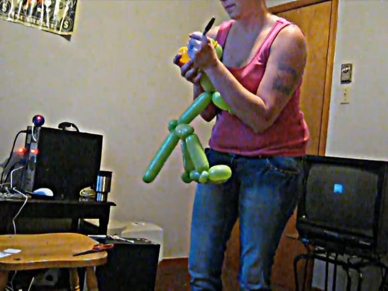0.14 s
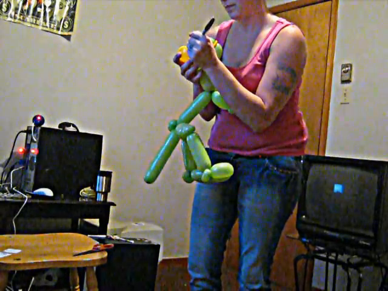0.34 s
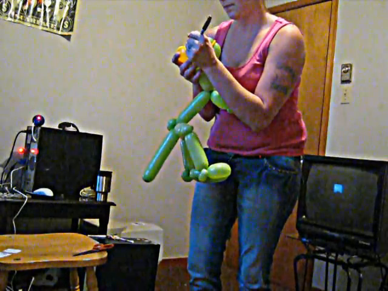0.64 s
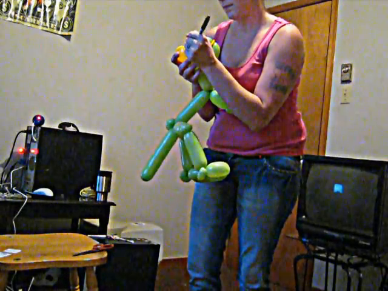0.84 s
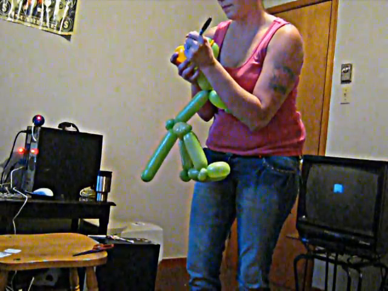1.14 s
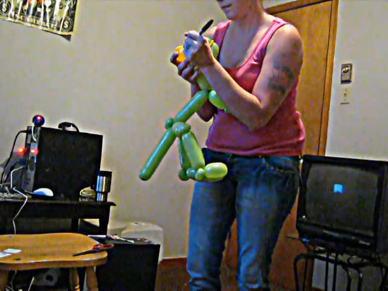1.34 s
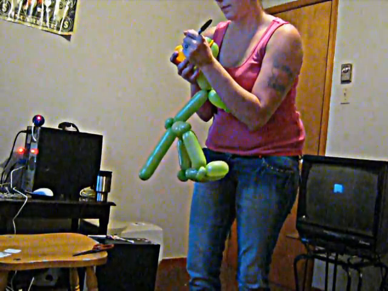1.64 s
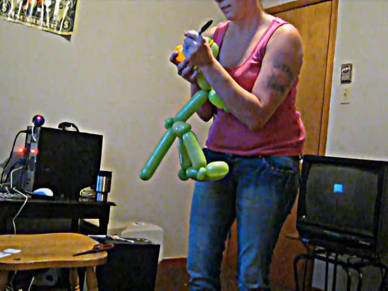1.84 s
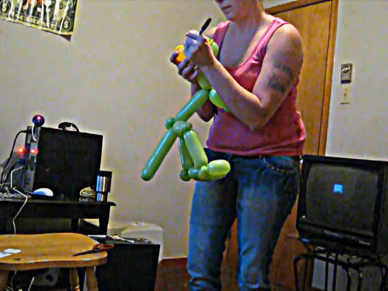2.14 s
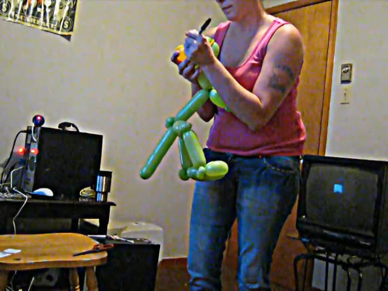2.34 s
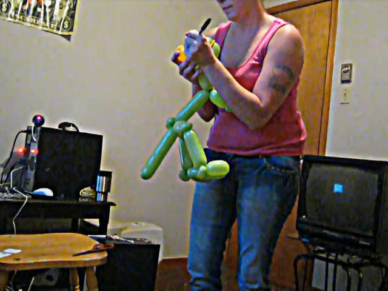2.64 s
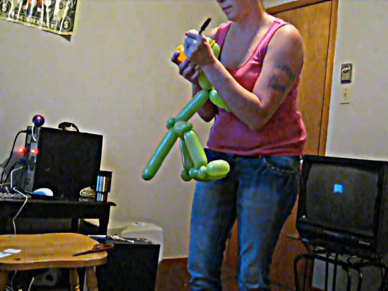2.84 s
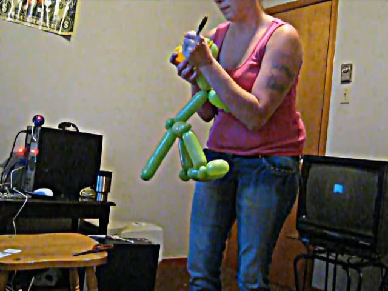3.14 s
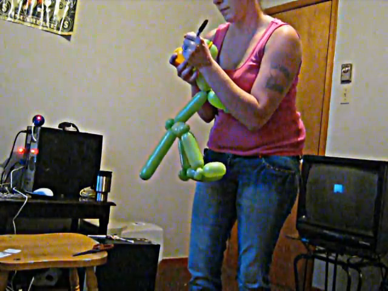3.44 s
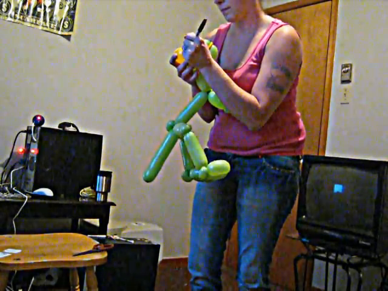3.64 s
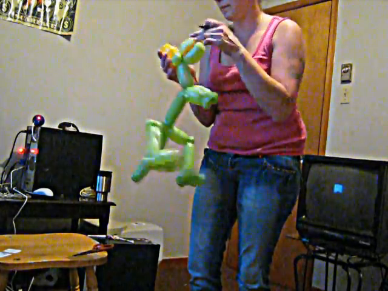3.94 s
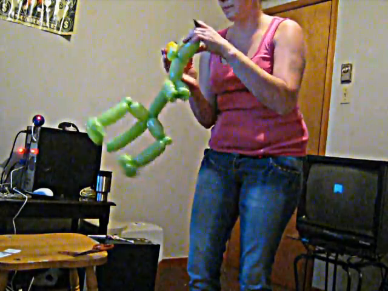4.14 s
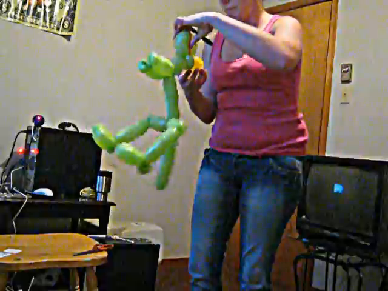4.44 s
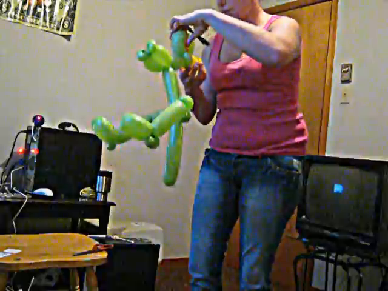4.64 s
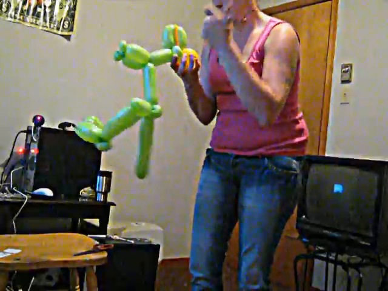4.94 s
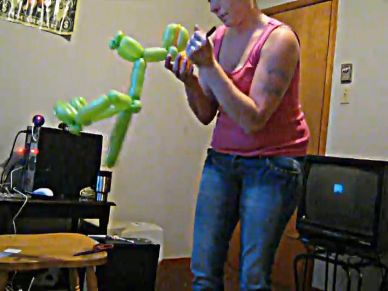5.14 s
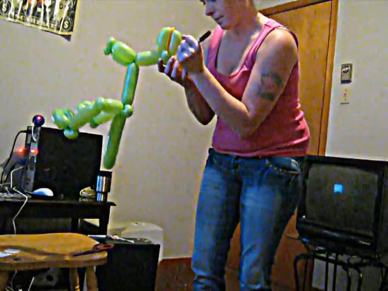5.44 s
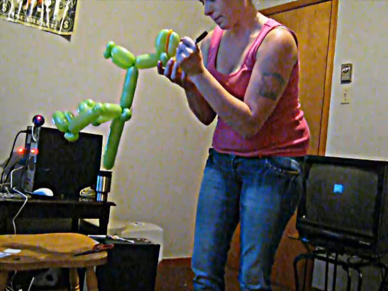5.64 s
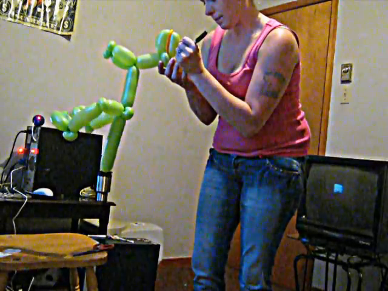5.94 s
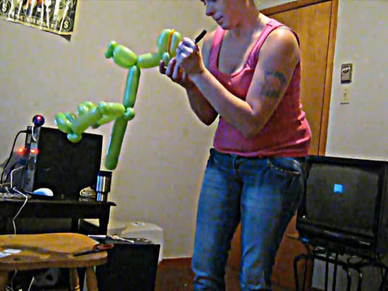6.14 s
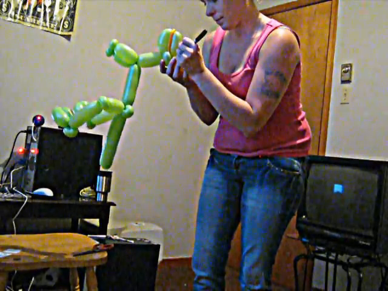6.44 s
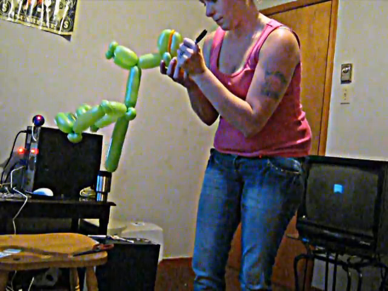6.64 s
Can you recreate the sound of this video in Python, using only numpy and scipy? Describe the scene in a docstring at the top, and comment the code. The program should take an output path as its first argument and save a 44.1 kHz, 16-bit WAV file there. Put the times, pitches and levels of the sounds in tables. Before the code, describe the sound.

A small, lively room with steady hiss and a low hum, heard a few steps away. From 0 to 1 s a marker squeaks on a tight balloon in quick short strokes, about ten a second, alternating bright squeals with lower, rougher scrapes. From 1 to 1.5 s the strokes lengthen and jump in pitch, then leave a gap to about 1.8 s, with one barely audible touch. A long stroke dips and climbs until 2.15 s, and dense squeaks continue to 3.8 s, with faint soft thumps beneath. At 3.8 s the skin snaps and the balloon is turned: irregular hollow creaks, dry rasps, clicks and brief thin whistles, busiest from 4.2 to 5 s, thinning out by 5.5 s with two sharp snaps. Quiet room tone follows. At 6.17 s comes one loud, crisp tap with a short ring off the walls; from about 6.65 s a last low squeak wavers to 6.8 s.

```python
"""A marker draws circles on a balloon figure in a small room, a few steps from the microphone.
The tip sticks and slips on the latex: trains of clicks, coloured by the skin, squeak, squeal and scrape.
Then hands turn the figure: uneven slips creak and rasp, the skin snaps as decaying noise clicks,
the tip taps down once and the drawing goes on. Brief skids whistle, soft low thumps sound underneath.
Near walls reflect the balloon over steady hiss and hum; a fast limiter rides the peaks."""
import sys
import numpy as np
from scipy import signal
from scipy.fft import rfft, irfft
from scipy.io import wavfile
from scipy.ndimage import uniform_filter1d, minimum_filter1d

SR = 44100
rng = np.random.default_rng(int(sys.argv[2]) if len(sys.argv) > 2 else 0)


def digitize_waveform(pressure):
    """Quantize a signal to 16-bit integers and store it at the path in sys.argv[1].

    Rows of a 2-D input are taken as channels; values are limited to [-1, 1].
    """
    field = np.atleast_2d(pressure).T
    bounded = np.clip(field, -1, 1)
    quanta = np.round(bounded * 32767).astype(np.int16)
    wavfile.write(sys.argv[1], SR, quanta)


N = 299638
TIME = np.arange(N) / SR
CLOCK = TIME[::40]  # coarser time grid for slow controls [s]
EDGE_HZ = 7450  # upper edge of the sound


def from_db(db):
    """Decibels to gain."""
    return 10 ** (np.asarray(db) / 20)


def unit(x):
    """Scales to rms 1."""
    return x / np.sqrt(np.mean(x ** 2) + 1e-20)


def read(points, hz):
    """Reads a curve on a log-frequency axis."""
    f, value = np.transpose(points)
    return np.interp(np.log(hz + 1), np.log(f), value)


def colour(x, points, size=2048):
    """Causal minimum-phase filter with the given spectrum."""
    hz = abs(np.fft.fftfreq(size, 1 / SR))
    log_gain = np.log(from_db(read(points, hz)))
    taps = np.fft.ifft(np.exp(np.conj(signal.hilbert(log_gain)))).real
    return signal.oaconvolve(x, taps[:size // 2])[:N]


def ring(x, hz, width_hz):
    """One resonance."""
    return signal.lfilter(*signal.iirpeak(hz, hz / width_hz, fs=SR), x)


def wander(hz):
    """Random drift of rms 1, mostly slower than hz."""
    return unit(signal.sosfilt(signal.butter(2, hz, fs=SR, output="sos"), rng.standard_normal(N)))


def steady(x, size=500):
    """Holds the short-term rms near 1, over windows of size samples."""
    power = uniform_filter1d(uniform_filter1d(x ** 2, size), size)
    return x / np.sqrt(abs(power) + 1e-20)


def slips(turns):
    """One click at each whole turn, shared between two samples to keep its exact moment."""
    at = np.flatnonzero(np.diff(np.floor(turns)) > 0)
    late = (np.floor(turns[at + 1]) - turns[at]) / (turns[at + 1] - turns[at])
    clicks = np.zeros(N)
    clicks[at] += 1 - late
    clicks[at + 1] += late
    return clicks


def envelope(start, length, shape):
    """Smooth rise, a hold that fades a little, then release."""
    rise_s, fade_db, release_s = shape
    age = CLOCK - start
    rise = .5 + .5 * np.tanh(age / rise_s / 2)
    hold = from_db(fade_db * np.clip(age / length, 0, 1))
    release = np.exp(-np.maximum(age - length, 0) / release_s)
    return rise * hold * release


def bend(start, length, pitches):
    """The tip speeds up and slows down: one arc through the first, middle and last pitch."""
    arc = np.polyfit([0, .5, 1], pitches, 2)
    return np.polyval(arc, np.clip((CLOCK - start) / length, 0, 1))


def drawing():
    """One tip plays all the strokes: the strongest at each moment sets its pitch and character."""
    # squeals: (start [s], length [s], relative level [dB],
    #           first, middle and last slip rate [Hz], treble lift [dB])
    squeals = [(0, 0.042, -23, 814.6, 839.9, 825, -4.5), (.272, 0.043, -18.5, 800.5, 834.5, 854.2, -5.5),
               (0.49, .06, -18.5, 789.6, 755, 803.7, -1.5), (0.596, .028, -27.5, 775.3, 801, 780.4, -12),
               (0.709, .05, -18.5, 710.5, 704.1, 659.6, 4), (2.2, .04, -23, 766.7, 842, 833.7, -3),
               (2.257, .036, -21.5, 833.7, 804.7, 760.8, -7.5),
               (2.374, 0.032, -24.5, 786.2, 801.6, 794.5, -3), (2.401, .0126, -12, 800.4, 792, 759.7, -5.5),
               (2.501, .03, -22.5, 758.8, 819, 819.3, -8), (2.722, .04, -23, 769.6, 816, 829, -8.5)]
    # short, light strokes: (start [s], length [s], relative level [dB], first, middle and last pitch [Hz])
    squeaks = [(0.116, 0.032, -35, 620.2, 750, 700.4), (0.356, 0.02, -28, 628.1, 745, 808.7),
               (.565, 0.023, -29.5, 579.2, 722.7, 780.5), (0.901, 0.057, -21, 704, 772, 739),
               (2.6, 0.054, -23, 729.4, 690.4, 570), (2.808, 0.024, -28, 571.8, 719, 768),
               (2.834, 0.029, -20, 690.6, 624.7, 561.3), (2.914, 0.049, -26.5, 698.3, 770.5, 716.8),
               (3.305, .022, -22, 682.5, 665, 621.2), (3.352, 0.069, -22.5, 567.8, 783, 651),
               (3.486, .075, -25, 688.7, 716.3, 583), (3.608, 0.045, -28.5, 662.3, 735, 693),
               (3.693, .03, -27, 597, 689, 716)]
    # the tip presses harder: (start [s], length [s], relative level [dB], lowest pitch [Hz])
    scrapes = [(0.211, .056, -22, 479.6), (0.437, 0.052, -28.5, 479.5), (0.642, 0.064, -26.5, 500),
               (0.769, 0.049, -27.5, 560), (0.843, 0.055, -23, 470.2), (0.958, .045, -27.5, 538),
               (1.32, 0.057, -27, 469.3), (2.294, 0.034, -27, 530), (2.418, 0.071, -24.5, 480.3),
               (2.656, .06, -25.5, 541.7), (2.868, 0.043, -26, 529), (3.249, .05, -24.5, 487.8),
               (3.415, .06, -27, 484), (3.725, 0.059, -24.5, 458.5)]
    # long strokes that glide in pitch, one curve each: (time [s], slip rate [Hz], relative level [dB])
    glides = [
        [(1.012, 732, -29.5), (1.052, 711, -24), (1.07, 555, -23.5), (1.092, 567, -20), (1.115, 678, -26.5),
         (1.15, 660, -35.5), (1.195, 709, -34.5)],
        [(1.208, 493.5, -22.5), (1.26, 503.7, -22), (1.278, 650, -22), (1.298, 629, -22.5), (1.32, 487, -27),
         (1.395, 472, -24.5), (1.44, 482.7, -32.5), (1.475, 493.6, -29.5), (1.53, 482, -37.5)],
        [(1.787, 500.6, -29), (1.82, 468, -29), (1.845, 477.7, -29), (1.877, 496, -29), (1.895, 544, -18.5),
         (1.928, 593, -22), (1.972, 507.4, -25), (2.04, 637, -23), (2.095, 802.5, -25), (2.145, 794.3, -28)],
        [(3.005, 478, -31.5), (3.046, 492, -23.5), (3.056, 610.5, -24), (3.075, 630, -21.5),
         (3.125, 721.3, -22), (3.175, 762, -26), (3.2, 684.5, -27), (3.228, 660, -24), (3.25, 520.2, -28.5)],
        [(6.63, 472, -41), (6.674, 451.6, -26.5), (6.7, 481.2, -23), (6.728, 480, -24), (6.756, 404.3, -28.5),
         (6.79, 440.3, -24.5)],
    ]
    strokes = [glide(curve) for curve in glides]
    strokes += [squeak(*row) for row in squeaks]
    strokes += [scrape(*row) for row in scrapes]
    strokes += [squeal(*row) for row in squeals]
    strokes = np.array([np.broadcast_arrays(*stroke) for stroke in strokes])
    weight = strokes[:, :1] ** 4 + 1e-30
    controls = (weight * strokes[:, 1:]).sum(0) / weight.sum(0)
    gain = strokes[:, 0].max(0)
    return [np.interp(TIME, CLOCK, control) for control in (gain, *controls)]


def squeal(start, length, db, first_hz, middle_hz, last_hz, lift_db):
    """A squeak whose slips lock to the skin, so that it jumps an octave; the weaker, the rougher."""
    shape = (.0025, -3.5, .007)  # rise [s], fade [dB], release [s]
    second_slip, grit_db = .842, -37.5  # share of the slip halfway; grit under the stroke
    hz = bend(start, length, [first_hz, middle_hz, last_hz])
    return from_db(db) * envelope(start, length, shape), hz, from_db(grit_db - db), second_slip, lift_db


def disperse(x, spread_s=0.003002):
    """High notes run through the skin faster than low ones, so each slip is drawn out."""
    hz = np.fft.rfftfreq(2 * N, 1 / SR)
    delay = spread_s * np.maximum(1 - hz / EDGE_HZ, 0)
    phase = -2 * np.pi * np.cumsum(delay) * hz[1]
    return irfft(rfft(x, 2 * N) * np.exp(1j * phase))[:N]


def marker(gain, hz, rough, locked, lift_db):
    """Stick-slip pulses of the tip, radiated by the balloon's skin."""
    # colour of the balloon under the tip: (frequency [Hz], level [dB])
    skin = [(330, -34), (420, -6.5), (520, -7), (730, 0.5), (860, -1), (1000, 1.5), (1250, 1.5),
            (1580, 3.5), (2200, 0.5), (2950, 2), (3350, -1), (4200, -2.5), (5200, -11), (7000, -31)]
    rough = np.clip(rough, 0, 1)
    # a rough stroke lurches in pitch, a squeal wavers
    lurch = rough * (.062 * wander(430) + .085 * wander(45))
    waver = .01498 * locked * wander(51.6)
    # even a clean stroke slips a little early or late, which blurs its top
    jitter = 0.014 * wander(900)
    turns = np.cumsum(hz * np.exp(lurch + waver)) / SR + jitter
    force = np.exp(1.3 * rough * np.tanh(wander(550)))
    # in a squeal a second slip comes halfway through each cycle
    pulses = (slips(turns) + np.clip(locked, 0, 1) * slips(turns + .5)) * force
    grit = rough ** 2 * rng.standard_normal(N)
    voice = colour(disperse(unit(pulses)) + grit, skin)
    # some squeals are round, others shrill; the overtones flutter as the tip rocks on the skin
    treble = signal.sosfiltfilt(signal.butter(4, 2200, "high", fs=SR, output="sos"), voice)
    voice = steady(voice + (from_db(lift_db + 4.8 * wander(24)) - 1) * treble)
    return voice * gain * from_db(3.8 * rough * wander(99))


def drone(hz=216, width_hz=45, db=-53, end_s=3.76):
    """The air inside the balloon hums faintly, fading out over the last second before end_s."""
    air = ring(ring(rng.standard_normal(N), hz, width_hz), hz, width_hz)
    return from_db(db) * unit(air) * np.clip(end_s - TIME, 0, 1)


def room_floor(db=-47.5):
    """Steady hiss and hum of the room: coloured noise."""
    # relative spectrum: (frequency [Hz], density [dB per Hz])
    spectrum = [(25, -14.5), (500, -10), (565, -2.5), (640, -10), (2000, -17.5), (5500, -19), (7500, -46.5)]
    return from_db(db) * unit(colour(rng.standard_normal(N), spectrum))


def room(x):
    """Dense reflections from near walls, each band dying at its own speed."""
    # the room's decay: (frequency [Hz], time to fall 60 dB [s])
    decay = [(600, 0.49), (2000, 0.5), (6000, 0.33)]
    # about 3000 reflections per second, none in the first 3 ms
    taps = rng.standard_normal(SR) * (rng.random(SR) < 3000 / SR) * (TIME[:SR] > .003)
    hz, t, bands = signal.stft(taps, SR, nperseg=256)
    fading = np.exp(-np.log(1000) * t / read(decay, hz)[:, None])
    tail = signal.istft(bands * fading, SR, nperseg=256)[1]
    return signal.oaconvolve(x, tail / np.linalg.norm(tail))[:N]


def squeak(start, length, db, *pitches):
    """A light stroke bends once in pitch; the weaker it is, the rougher."""
    shape, grit_db = (.004, -2, .008), -32.5  # rise [s], fade [dB], release [s]; grit under the stroke
    gain = from_db(db) * envelope(start, length, shape)
    return gain, bend(start, length, pitches), from_db(grit_db - db), 0, 0


def scrape(start, length, db, lowest_hz):
    """Pressure rises and falls in one arch; it drags the pitch down and roughens the slips."""
    rise_s, fade_db, release_s = .002, -3, .01
    free_hz, skew = 796.3, .6  # pitch without pressure; a skew under 1 makes the pressure peak early
    light_rough, pressed_rough = .11, .65
    progress = np.clip((CLOCK - start) / (length + release_s), 0, 1)
    press = np.sin(np.pi * progress ** skew)
    hz = free_hz + (lowest_hz - free_hz) * press
    rough = light_rough + (pressed_rough - light_rough) * press ** 2
    return from_db(db) * envelope(start, length, (rise_s, fade_db, release_s)), hz, rough, 0, 0


def thumps(width_s=.0023):
    """Each soft low thump is one short swing up and down."""
    # (time [s], relative level [dB])
    times_and_levels = [(.285, -35), (0.524, -32.5), (.866, -31), (1.1, -32), (1.905, -30), (2.41, -31),
                        (3.09, -33.5), (3.725, -27), (3.872, -30), (4.001, -31), (4.545, -33), (5.222, -35)]
    out = np.zeros(N)
    for s, db in times_and_levels:
        age = (TIME - s) / width_s
        out -= from_db(db) * age * np.exp(-abs(age))
    return out


def chirps(rise_s=0.015, waver=0.034):
    """Tip or finger skids on the latex: each skid is a brief, wavering whistle of the skin."""
    # (time [s], pitch [Hz], relative level [dB])
    skids = [(0.997, 1024, -25.5), (4.152, 970, -31.5), (4.327, 1100, -31), (4.628, 2400, -28.5),
             (4.814, 1820, -28.5), (5.035, 2700, -33)]
    out, drift = np.zeros(N), np.exp(waver * wander(352))
    for s, hz, db in skids:
        age = np.maximum(TIME - s, 0) / rise_s
        whistle = np.sin(2 * np.pi * np.cumsum(hz * drift) / SR)
        out += from_db(db) * age * np.exp(1 - age) * whistle
    return out


def glide(curve, edge_s=.006, rough=.08):
    """A long, clean stroke. Like every stroke it gives (gain, pitch, roughness, lock, treble lift)."""
    s, hz, db = np.transpose(curve)
    outside = abs(CLOCK - np.clip(CLOCK, s[0], s[-1]))
    gain = from_db(np.interp(CLOCK, s, db)) * np.exp(-outside / edge_s)
    return gain, np.interp(CLOCK, s, hz), rough, 0, 0


def handling(groan_hz=215, groan_width_hz=150, groan_db=-50):
    """Latex drags on fingers and itself: slow, uneven slips ring the air-filled tubes; the body groans."""
    # fingers and twisted joints rub as the figure is turned:
    # (start [s], length [s], relative hollow creak level [dB], relative sharp rasp level [dB])
    rubs = [(3.83, 0.061, -34, -25), (3.885, 0.12, -30.5, -26), (4.037, 0.22, -42.5, -40.5),
            (4.143, 0.054, -35, -32.5), (4.212, 0.074, -34, -32.5), (4.327, 0.067, -31, -31),
            (4.432, 0.017, -25, -31.5), (4.511, .014, -36, -26), (4.524, 0.028, -26.5, -20),
            (4.632, 0.0072, -22.5, -20), (4.685, 0.03, -25.5, -23.5), (4.787, 0.011, -30, -28),
            (4.816, 0.031, -29.5, -21.5), (4.869, 0.12, -31.5, -26.5), (5.03, 0.034, -51, -28),
            (5.146, 0.081, -41.5, -37.5), (5.216, 0.018, -34.5, -21.5), (5.274, 0.06, -67, -28),
            (5.386, 0.019, -33.5, -29.5), (5.455, 0.033, -43.5, -42)]
    # colour of the hollow tubes: (frequency [Hz], level [dB])
    hollow_colour = [(100, -28), (200, -15.5), (300, -9), (560, 8), (850, 4.5), (1300, 6), (2000, -41)]
    # colour of the balloon under the fingers: (frequency [Hz], level [dB])
    rasp_colour = [(700, -8), (1700, 2.5), (3000, 5), (4700, 0.5), (7000, -22.5)]
    touch = (1.5, 0, -48.5, -44)  # one faint, brief touch, columns as in rubs
    rub_shape, twist_shape = (.0039, -4, .012), (.02, -8, .03)  # rise [s], fade [dB], release [s]
    crackles_per_s, crackle_db = 22, 23.5

    gains = [from_db(dbs)[:, None] * envelope(s, length, rub_shape) for s, length, *dbs in rubs + [touch]]
    creak_gain, rasp_gain = np.max(gains, axis=0)
    twist_gain = envelope(4.19, .97, twist_shape)  # the body is twisted round: start [s], length [s]
    hollow, rasp, twist = [np.interp(TIME, CLOCK, g) for g in (creak_gain, rasp_gain, twist_gain)]

    turns = np.cumsum(320 * np.exp(.35 * wander(14) + .25 * wander(249.95))) / SR
    drive = unit(slips(turns) * np.exp(0.32 * wander(370))) + 0.65 * rng.standard_normal(N)
    groan = ring(ring(drive, groan_hz, groan_width_hz), groan_hz, groan_width_hz)
    groan = from_db(groan_db) * unit(groan)
    # now and then a larger slip lets go; it is heard where the rasp is open
    lets_go = rng.random(N) < crackles_per_s / SR
    crackle = from_db(crackle_db) * lets_go * rng.uniform(-1.3, 1, N)
    creaks = steady(colour(drive, hollow_colour)) * hollow
    rasps = unit(colour(drive + crackle, rasp_colour)) * rasp
    return creaks + rasps + groan * twist


def snaps(t60=0.034):
    """The skin lets go or is tapped: a click and a short rattle of the membrane."""
    # single snaps of the skin: (time [s], relative level [dB])
    releases = [(3.8249, -10.5), (3.9969, -9.5), (4.212, -13.5), (4.325, -17), (4.434, -15.5),
                (4.632, -17.5), (4.817, -9), (5.393, -11.5), (5.461, -9.5), (6.165, 0)]
    # colour of the balloon when it snaps: (frequency [Hz], level [dB])
    snap_colour = [(700, -14.5), (1300, -15), (1750, 0), (2200, -8.5), (3000, -4.5), (3450, 2), (3950, -3),
                   (4450, -2.5), (5200, -15), (7000, -31.5)]
    clicks = np.zeros(N)
    for s, db in releases:
        clicks[round(s * SR)] = from_db(db)
    t = TIME[:SR // 2]
    rattle = 0.11 * rng.standard_normal(len(t)) * np.exp(-np.log(1000) * t / t60)
    rattle[0] = 1  # the click itself
    return from_db(14.0) * colour(signal.oaconvolve(clicks, rattle)[:N], snap_colour)


def scene():
    """The balloon direct and off the walls, the thumps and the steady floor in one channel."""
    balloon = marker(*drawing()) + drone() + handling() + chirps() + snaps()
    direct = from_db(-1.0) * balloon
    reflected = from_db(-3.0) * room(balloon)
    return (direct + reflected + thumps() + room_floor())[None]


def record(dry, limit_db=-10.5, recovery_db_per_s=242.5):
    """A fast limiter ducks the peaks; then the band limit."""
    over_db = np.maximum(20 * np.log10(abs(dry[0]) + 1e-9) - limit_db, 0)
    over_db = -minimum_filter1d(-over_db, size=20)  # it looks a moment ahead
    fall_db = TIME * recovery_db_per_s
    duck_db = np.maximum.accumulate(over_db + fall_db) - fall_db
    limited = dry * from_db(-uniform_filter1d(duck_db, size=20))
    low_pass = signal.firwin(161, EDGE_HZ, window=("kaiser", 7), fs=SR)
    return signal.oaconvolve(limited, low_pass[None], "same")


dry = scene()
out = record(dry)
digitize_waveform(out)
```